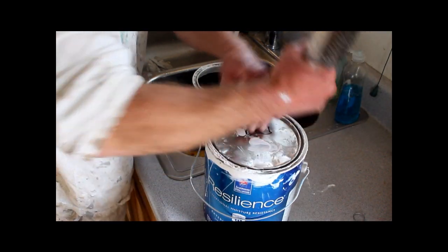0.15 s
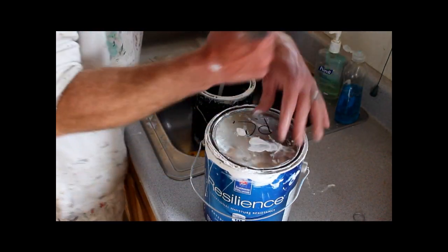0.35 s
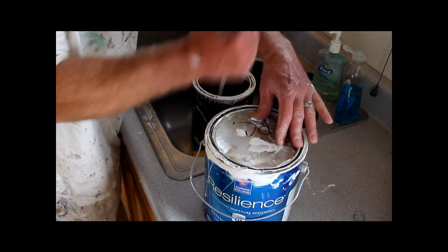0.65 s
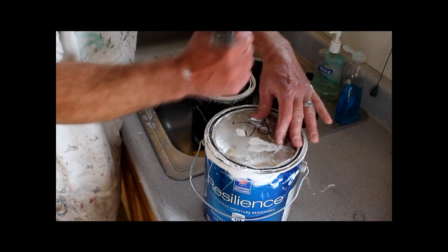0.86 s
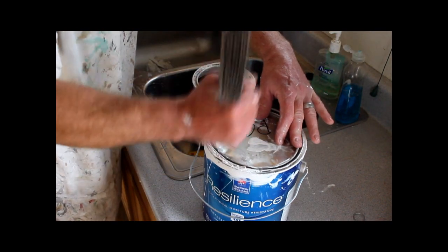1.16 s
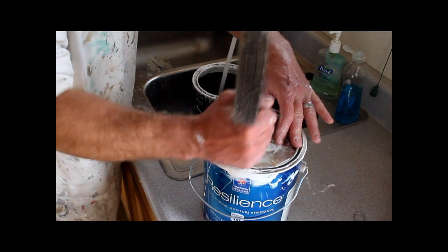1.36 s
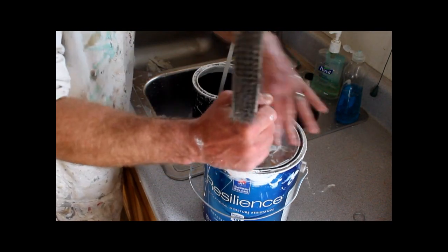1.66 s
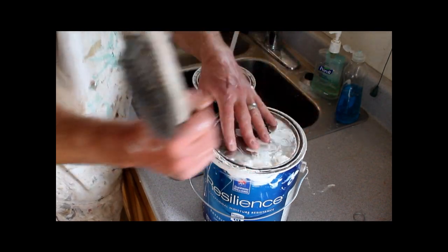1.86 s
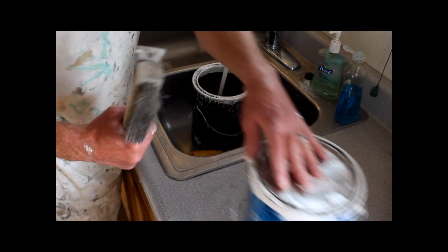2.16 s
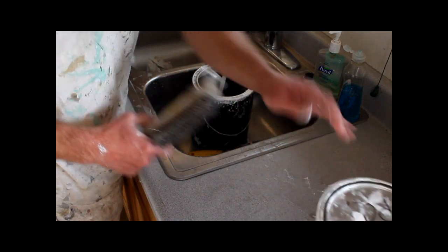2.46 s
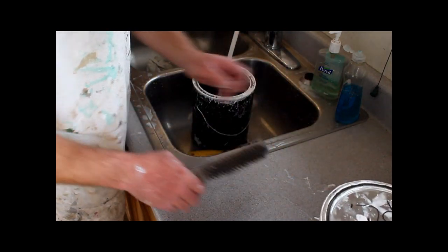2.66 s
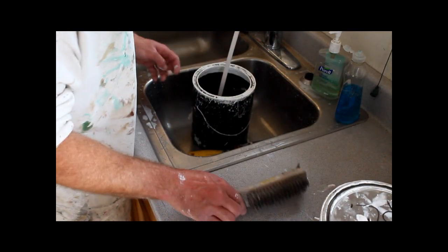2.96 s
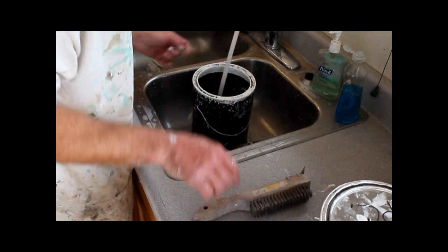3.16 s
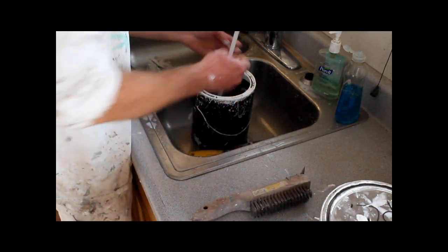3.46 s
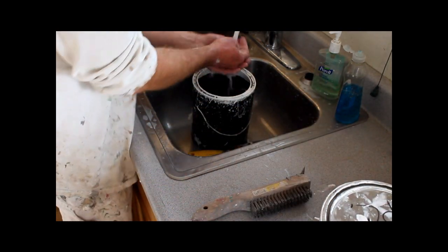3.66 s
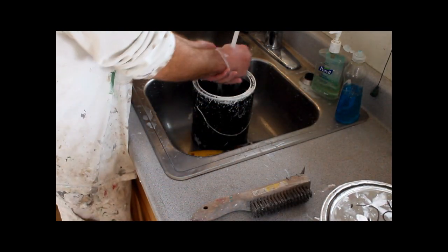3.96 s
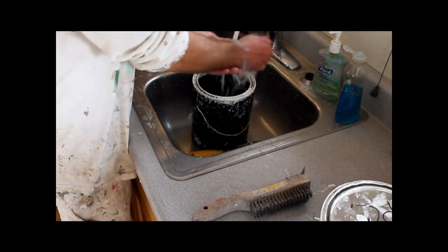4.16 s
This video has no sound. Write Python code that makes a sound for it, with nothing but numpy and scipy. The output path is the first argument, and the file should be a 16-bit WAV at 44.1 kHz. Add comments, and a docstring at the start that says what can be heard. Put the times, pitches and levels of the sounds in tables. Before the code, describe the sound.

Steady bright running water over a faint low room wash. Uneven, hollow metallic knocks on a full can come first, growing hard and overloaded, with short room echoes and the water dipping after them. A low grainy slide swells and fades, then a brush is set down in two quick taps. After that almost only water remains, with one very faint bump near the end. Centred, close recording.

```python
"""The lid of a full paint can is knocked shut with the back of a wire brush: each blow snaps, cracks and rings modes.
The can is then slid along the counter, grains exciting its resonances, and the brush is put down with modal blows.
Behind this a tap runs into a can in a steel sink, as coloured grains and ringing metal, over a low wash of the room.
The small room answers each blow with echoes and a tail; one signal feeds both channels.
The recorder overloads on the knocks and ducks the hiss of the water."""
import sys
import numpy as np
from scipy import signal
from scipy.fft import rfft, irfft, next_fast_len
from scipy.io import wavfile

SR = 44100
rng = np.random.default_rng(int(sys.argv[2]) if len(sys.argv) > 2 else 0)


def digitize_waveform(pressure):
    """Quantize a signal to 16-bit integers and store it at the path in sys.argv[1].

    Rows of a 2-D input are taken as channels; values are limited to [-1, 1].
    """
    field = np.atleast_2d(pressure).T
    bounded = np.clip(field, -1, 1)
    quanta = np.round(bounded * 32767).astype(np.int16)
    wavfile.write(sys.argv[1], SR, quanta)


N = 189652
TIME = np.arange(N) / SR  # s

# Low wash of the room. Each row: frequency in Hz, relative level in dB per Hz.
WASH_SPECTRUM = [(25, -42), (70, -9), (120, -11.5), (165, -2.5), (215, 8), (280, 1.5), (550, 5.5), (750, 3),
                 (950, -10.5), (1600, -18.5)]
# Decay of the room's tail. Each row: frequency in Hz, time to fall 60 dB in seconds.
ROOM_DECAY = [(100, 0.5), (300, 0.42), (700, 0.5), (1500, 0.53), (4000, 0.43), (12000, 0.2)]
# Reflections off walls and ceiling. Each row: delay in seconds, relative level in dB.
ROOM_ECHOES = [(.0075, -49), (0.0133, -7), (0.0208, -10), (0.0412, -10), (0.0475, -14), (0.0556, -10.5)]
# Hiss of the stream. Each row: frequency in Hz, relative level in dB per Hz.
HISS_SPECTRUM = [(1200, -23.5), (2500, -9), (3200, -5), (4000, -5.5), (4600, 0), (6400, -0.5), (7800, -1.5),
                 (8800, -2), (10000, -7), (11200, -6.5), (12200, -4), (13300, -4), (14000, -7.5),
                 (15700, -8)]
# Splash of droplets in the can. Each row: frequency in Hz, relative level in dB per Hz.
SPLASH_SPECTRUM = [(500, -16), (950, -5), (1300, 1), (1800, 2.5), (2300, 0.5), (3000, -5.5), (4000, 1.5),
                   (6000, -11.5)]
# The sink ringing under the stream. Each row: frequency in Hz, width in Hz, relative level in dB.
SINK_RESONANCES = [(1830, 41, 0), (2137, 26, -3), (2240, 24, -0.5), (2700, 45, -1), (3040, 53, -2),
                   (3200, 46, -15), (3374, 35, -5.5), (3660, 47, -14.5), (4074, 83, -4.5), (4440, 72, 2),
                   (4970, 81, 0), (5060, 90, 2), (5500, 60, -1), (6510, 210, -0.5), (7000, 72, 3.5),
                   (7570, 60, 4), (8070, 80, 3.5), (7830, 100, -6), (8893, 80, -18), (9420, 90, -2),
                   (9900, 110, -2), (10430, 58, -7), (10600, 90, -7), (11450, 83, -9), (12000, 79, -8),
                   (13400, 90, -8), (14298, 90, -2), (14556, 58, -5)]
# Resonances of the sliding can. Each row: frequency in Hz, width in Hz, relative level in dB.
SCRAPE_RESONANCES = [(220, 20, -5), (454, 190, -8.5), (654, 66, -0.5), (790.2, 66, -1.5), (918, 184, -1.5),
                     (1037, 210, -1.5), (1350, 120, -7), (1690, 300, -12), (2780, 1700, -20.5)]
# Crack of a contact. Each row: frequency in Hz, relative level in dB per Hz.
CRACK_SPECTRUM = [(25, -1.5), (100, -23), (200, 3), (450, 3), (1200, -0.5), (2200, -8.5), (4000, -12.5),
                  (8000, -7), (15000, -12)]
# Modes of the brush on the counter. Each row: frequency in Hz, level in dB, time to fall 60 dB in seconds.
COUNTER_MODES = [(230.6, -11.5, .09), (277.5, -18, 0.076), (384, -26, 0.25), (427, -20, 0.084),
                 (470, -15.5, 0.025), (650, -11.5, 0.044), (723, -20.5, 0.061), (815, -23, 0.033),
                 (1090, -37, 0.027), (1405, -46, 0.026), (2110, -32, 0.018), (3730, -14, 0.021)]
# Brush landing on the counter, handle then head, and a light bump at the sink.
# Each row: start in seconds, force in dB, boom of the low modes in dB, pitch the spot favours in Hz.
BRUSH_BLOWS = [(3.0222, -5.5, -3, 395), (3.0672, -3, -5, 827), (4.170, -24.5, -13, 806)]
# Modes of the can and its lid. Each row: frequency in Hz, level in dB, time to fall 60 dB in seconds.
CAN_MODES = [(132.5, -21, 0.14), (210.2, -13.5, 0.13), (222.4, -21, 0.097), (301, -18, 0.17),
             (350.5, -13.5, 0.21), (386, -19, 0.15), (429, -19, 0.077), (495, -19, 0.082), (611, -21, 0.1),
             (704.5, -20, 0.14), (809, -20.5, 0.056), (850, -11, 0.017), (925, -24, 0.035),
             (1062, -15.5, 0.038), (1195, -14, 0.029), (1240, -26.5, 0.037), (1450, -30, 0.078),
             (1710, -41, 0.072), (1830, -29, 0.031), (1820, -20, 0.029), (2290, -24.5, 0.0077),
             (2800, -55, .04), (2870, -20, .03), (3720, -15, .02)]
# Blows on the lid, three of them landing twice.
# Each row: start in seconds, force in dB, boom of the full can in dB, pitch the struck spot favours in Hz.
LID_BLOWS = [(0.001, -13, -1, 603), (0.1055, -3.5, 4.5, 260), (0.5900, -12.5, -2, 340),
             (0.8628, -1, 1, 632), (0.8782, 3.5, -2.5, 900), (1.0588, 0.5, -3, 430),
             (1.0728, 1.5, -15, 790), (1.2168, 1, -23, 446), (1.2300, -2, -4, 677.6), (1.4568, 4, -4, 1240),
             (1.6715, 2.5, 5, 672)]

# The low wash sinks a little towards the end, in a smooth step about WASH_SINKS_S.
WASH_DB, WASH_SINK_DB = -45.5, 4
WASH_SINKS_S, WASH_SINK_CONSTANT_S = 3.7, 0.082
# The hiss steps up when a hand shifts the can under the stream.
HISS_DB, SPLASH_DB = -30.5, -38.5
SHIFT_S, SHIFT_CONSTANT_S, SHIFT_HISS_DB = 2.64, 0.029, 1.76
# One push slides the can away: it gathers speed, then coasts to rest.
PUSH_START_S, PUSH_FASTEST_S, PUSH_STOP_S = 1.947, 2.444, 2.85
RUB_DB, RUB_FROM_REST_DB = -25.5, 23.5  # level at top speed; its rise from rest to top speed
RUB_DULLS_S, RUB_DULL_CONSTANT_S = 2.53, 0.062  # the rub turns dull as the hand eases off
TOP_CUT_HZ = 15750  # upper limit of the recorder


def from_db(db):
    """Turn decibels into gain."""
    return 10 ** (np.asarray(db) / 20)


def rms_one(x):
    """Scale a sound to rms 1."""
    return x / np.sqrt(np.mean(x ** 2) + 1e-20)


def at_hz(points, hz):
    """Read a curve between its points on a log-frequency axis."""
    frequency, value = np.transpose(points)
    return np.interp(np.log(np.maximum(hz, 1)), np.log(frequency), value)


def low_pass(x, hz, order=2):
    """Take off the treble with a Butterworth filter."""
    sections = signal.butter(order, min(hz, SR / 2 - 100), fs=SR, output="sos")
    return signal.sosfilt(sections, x)


def high_pass(x, hz, order=2):
    """Take off the bass with a Butterworth filter."""
    sections = signal.butter(order, hz, "high", fs=SR, output="sos")
    return signal.sosfilt(sections, x)


def colour(x, spectrum):
    """Weight a sound by a spectrum and scale it to rms 1."""
    size = next_fast_len(len(x))
    gain = from_db(at_hz(spectrum, np.fft.rfftfreq(size, 1 / SR)))
    return rms_one(irfft(rfft(x, size) * gain, size)[:len(x)])


def drift(knots_per_s):
    """Wander slowly by chance, with rms 1, on straight lines between random knots."""
    knots = rng.standard_normal(4096)
    return rms_one(np.interp(TIME * knots_per_s, np.arange(len(knots)), knots))


def changeover(at_s, constant_s):
    """Step smoothly from 0 to 1, halfway at at_s."""
    return 0.5 + 0.5 * np.tanh((TIME - at_s) / (2 * constant_s))


def resonate(x, peaks):
    """Excite parallel two-pole resonances of alternating sign; rms 1."""
    out = 0
    for k, (hz, width, db) in enumerate(peaks):
        r = np.exp(-np.pi * width / SR)  # pole radius: a narrow peak rings longer
        poles = [1, -2 * r * np.cos(2 * np.pi * hz / SR), r * r]
        ring = signal.lfilter([1, 0, -1], poles, x)
        out = out + (-1) ** k * from_db(db) * (1 - r * r) * ring
    return rms_one(out)


def grains(per_s, spread_db):
    """Scatter tiny impacts of uneven size and random sign."""
    hits = rng.random(N) < per_s / SR
    sizes = from_db(spread_db * rng.standard_normal(N))
    return hits * sizes * rng.choice([-1, 1], N) + 1e-18


def room(x, tail_db, echo_db, build_s):
    """Add a few distinct reflections and a diffuse tail that builds up and dies band by band."""
    t = np.arange(len(x)) / SR
    white = rng.standard_normal((2, len(x)))
    response = np.zeros(len(x))
    edges = np.geomspace(130, 15000, 11)
    for k, (low, high) in enumerate(zip(edges, edges[1:])):
        sections = signal.butter(2, [low, high], "band", fs=SR, output="sos")
        band = signal.sosfilt(sections, white[k % 2])  # neighbouring bands use separate noise
        response += band * from_db(-60 * t / at_hz(ROOM_DECAY, np.sqrt(low * high)))
    response *= from_db(tail_db) * (1 - np.exp(-(t / build_s) ** 2))
    for delay, db in ROOM_ECHOES:
        response[round(delay * SR)] += from_db(db + echo_db)
    return x + signal.fftconvolve(x, response)[:len(x)]


def basin(x, echo_db, t60):
    """The sink's steel walls throw back a quick cluster of reflections that ripples the spectrum; rms 1."""
    t = np.arange(SR // 20) / SR
    response = rng.standard_normal(len(t)) * from_db(-60 * t / t60) * (t > 0.002)
    response *= from_db(echo_db) / np.linalg.norm(response)
    return rms_one(x + signal.fftconvolve(x, response)[:N])


def strike(blows, modes, snap_db, crack_db, crack_t60, boom_hz, spot_db, spot_octaves,
           contact_hz, db_per_octave, radiate_hz, **space):
    """Each blow snaps, cracks and rings the modes near its spot most; a harder blow is brighter."""
    out = np.zeros(N + SR)
    t = np.arange(SR // 2) / SR
    hz, mode_db, t60 = np.transpose(modes)
    rings = np.sin(2 * np.pi * hz[:, None] * t) * from_db(-60 * t / t60[:, None])
    snap = from_db(snap_db) * np.exp(-t / 0.00028)
    for start_s, force_db, boom_db, spot_hz in blows:
        favour_db = spot_db * np.exp(-(np.log2(hz / spot_hz) / spot_octaves) ** 2)
        strength = from_db(mode_db + favour_db + boom_db * (hz < boom_hz))
        # the low modes move as one; the higher ones start up or down at random
        sign = np.where(hz < boom_hz, 1, rng.choice([-1, 1], len(hz)))
        ringing = (strength * sign) @ rings
        crack = colour(rng.standard_normal(len(t)), CRACK_SPECTRUM)
        crack = from_db(crack_db) * crack * from_db(-60 * t / crack_t60)
        bright_hz = contact_hz * 2 ** (force_db / db_per_octave)
        blow = from_db(force_db) * low_pass(ringing + snap + crack, bright_hz)
        blow = high_pass(blow, radiate_hz, order=4)  # a small body radiates little bass
        start = max(round(start_s * SR), 0)
        # each blow draws its own random tail, so no single pitch hums through them all
        out[start:start + len(t)] += room(blow, **space)
    return out[:N]


def room_wash():
    """Shape noise into the low wash of the room, which sinks towards the end."""
    wash_db = WASH_DB - WASH_SINK_DB * changeover(WASH_SINKS_S, WASH_SINK_CONSTANT_S)
    return from_db(wash_db) * colour(rng.standard_normal(N), WASH_SPECTRUM)


def running_tap():
    """An aerated stream hisses and sets the sink ringing, and droplets splash in the can; all waver by chance."""
    hiss_db = HISS_DB + SHIFT_HISS_DB * changeover(SHIFT_S, SHIFT_CONSTANT_S)
    hiss_db = hiss_db + 0.17 * drift(5.94) + 0.54 * drift(60)
    stream = colour(grains(per_s=18000, spread_db=3.5), HISS_SPECTRUM)
    sink_ring = from_db(-7.5) * resonate(rng.standard_normal(N), SINK_RESONANCES)
    hiss = from_db(hiss_db) * basin(stream + sink_ring, echo_db=-7, t60=0.091)
    droplets = colour(grains(per_s=5000, spread_db=1.0), SPLASH_SPECTRUM)
    splash = from_db(SPLASH_DB + 0.48 * drift(35)) * droplets
    return hiss + splash


def brush_put_down():
    """The brush lands on the counter, handle then head, and a light bump follows at the sink."""
    return strike(BRUSH_BLOWS, COUNTER_MODES, snap_db=-11, crack_db=-15.5, crack_t60=0.066,
                  boom_hz=320, spot_db=4.5, spot_octaves=0.78, contact_hz=4500, db_per_octave=19,
                  radiate_hz=143, tail_db=-34.5, echo_db=-5.0, build_s=0.0068)


def sliding_can():
    """The rim catches on the counter's grain: louder and brighter with speed, duller once the hand eases off."""
    speed = np.interp(TIME, [PUSH_START_S, PUSH_FASTEST_S, PUSH_STOP_S], [0, 1, 0])  # 1 = fastest
    rub_db = RUB_DB - RUB_FROM_REST_DB * (1 - np.sin(np.pi / 2 * speed))
    rub = high_pass(resonate(grains(per_s=3000, spread_db=2.0), SCRAPE_RESONANCES), 250)
    dull = low_pass(rub, 610, order=1)
    bright_share = speed * (1 - changeover(RUB_DULLS_S, RUB_DULL_CONSTANT_S))
    mixed = dull + bright_share * (rub - dull)
    return (speed > 0) * from_db(rub_db + 0.31 * drift(70)) * mixed


def lid_knocks():
    """The back of the brush strikes the lid, and the full can booms below the ringing of its higher modes."""
    return strike(LID_BLOWS, CAN_MODES, snap_db=-1, crack_db=-5.5, crack_t60=0.087,
                  boom_hz=262, spot_db=8.0, spot_octaves=0.3, contact_hz=2320, db_per_octave=12.5,
                  radiate_hz=164, tail_db=-35.5, echo_db=-2.5, build_s=0.032)


def scene():
    """Lay the brush, slide and knocks over the wash and the running water; both channels alike."""
    background = room_wash() + running_tap()
    handling = brush_put_down() + sliding_can() + lid_knocks()
    return np.tile(background + handling, (2, 1))


def gain_control(x, threshold_db, release_db_per_s, attack_s):
    """The gain drops soon after the level passes the threshold and climbs back steadily."""
    power = signal.lfilter([0.005], [1, -0.995], np.mean(x ** 2, axis=0))
    over_db = np.maximum(10 * np.log10(power + 1e-12) - threshold_db, 0)
    # hold each peak of the excess and let it fall along a straight line in dB
    release_db = release_db_per_s * TIME
    held_db = np.maximum.accumulate(over_db + release_db) - release_db
    r = np.exp(-1 / (attack_s * SR))
    return x * from_db(-signal.lfilter([1 - r], [1, -r], held_db))


def record(dry):
    """The recorder rolls off the bass, rides the gain, clips what still exceeds its ceiling and cuts the top."""
    ceiling = 0.5
    levelled = gain_control(high_pass(dry, 42, order=1), threshold_db=-15.0,
                            release_db_per_s=156, attack_s=0.0067)
    clipped = np.clip(levelled, -ceiling, ceiling)
    top_cut = signal.ellip(12, 0.1, 90, TOP_CUT_HZ, fs=SR, output="sos")
    return signal.sosfilt(top_cut, clipped)


dry = scene()
out = record(dry)
digitize_waveform(out)
```